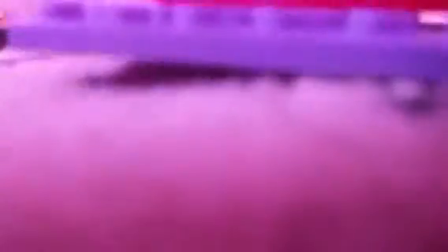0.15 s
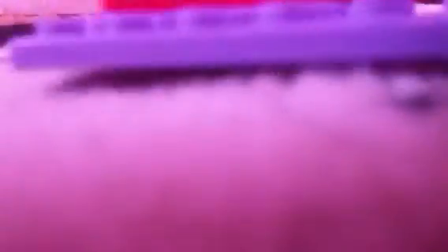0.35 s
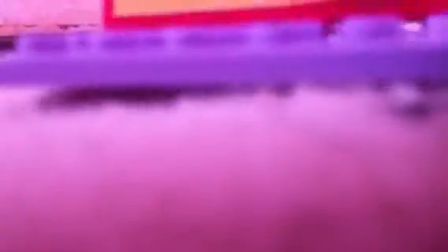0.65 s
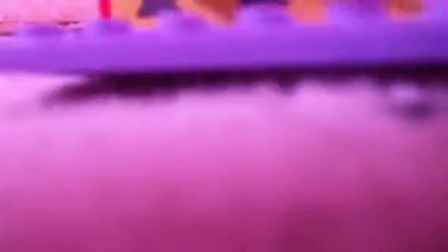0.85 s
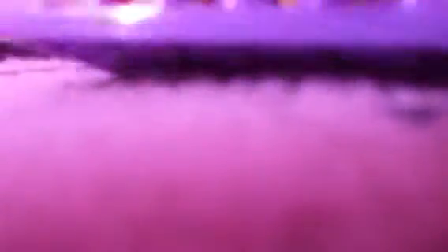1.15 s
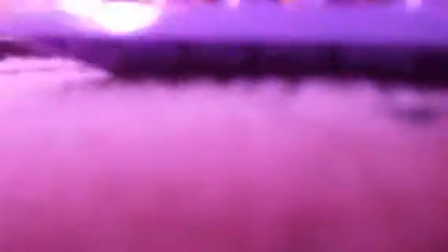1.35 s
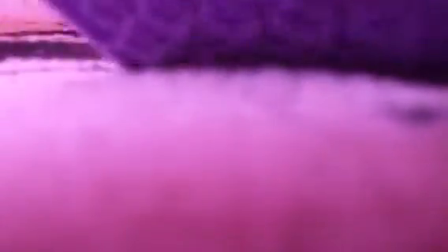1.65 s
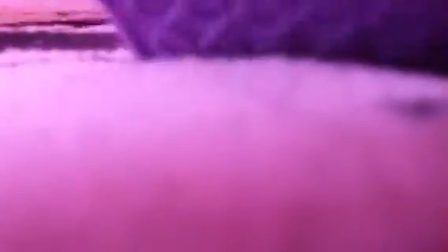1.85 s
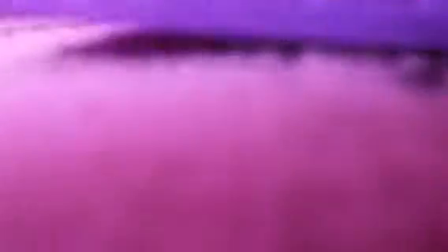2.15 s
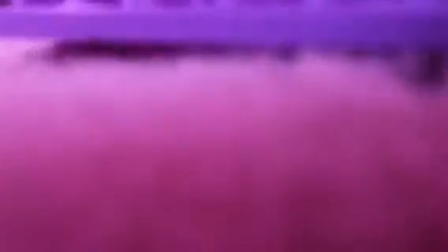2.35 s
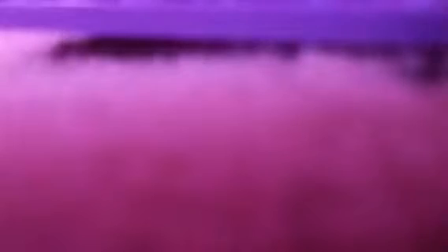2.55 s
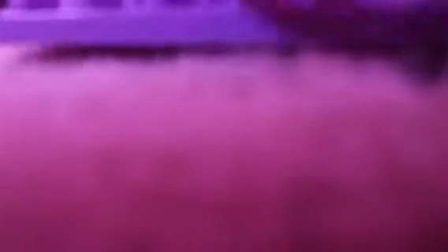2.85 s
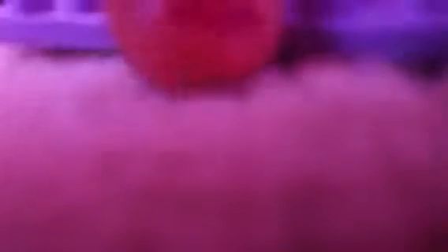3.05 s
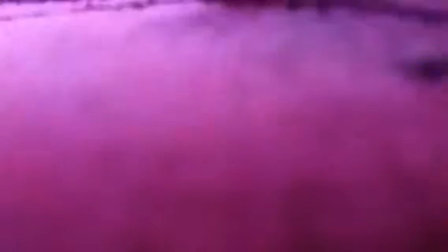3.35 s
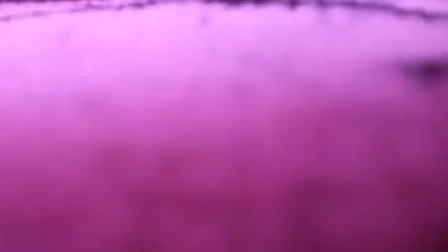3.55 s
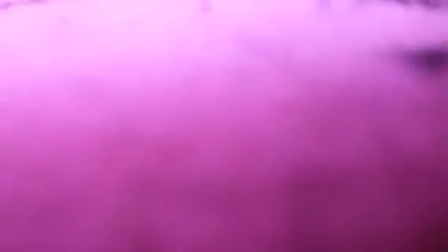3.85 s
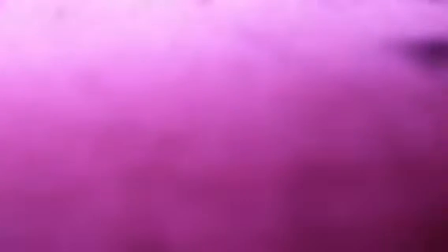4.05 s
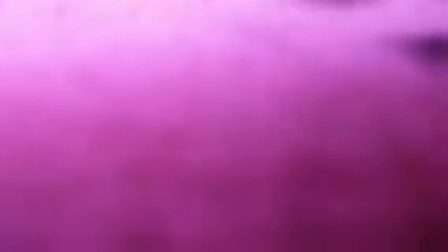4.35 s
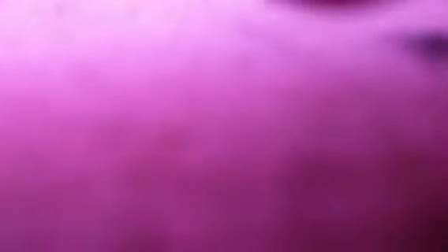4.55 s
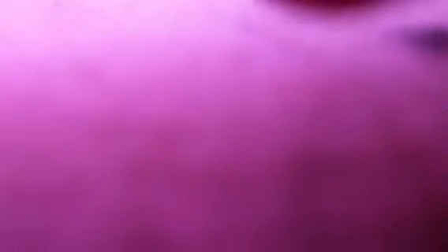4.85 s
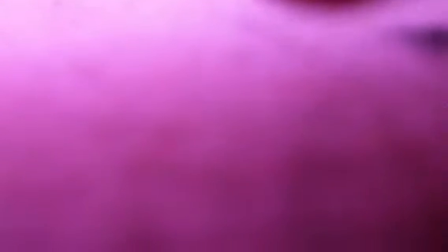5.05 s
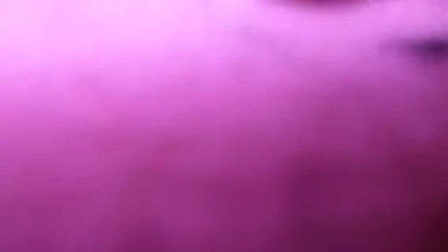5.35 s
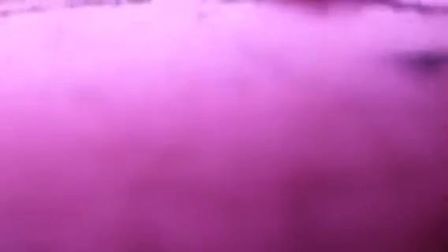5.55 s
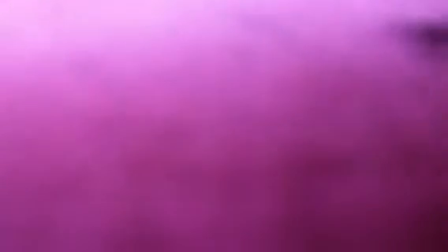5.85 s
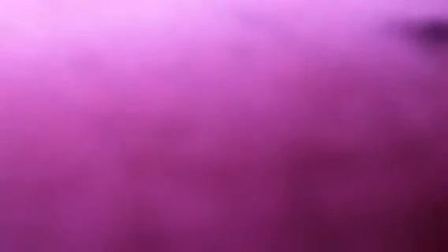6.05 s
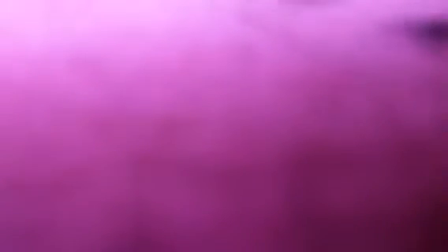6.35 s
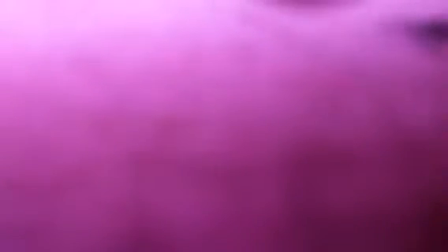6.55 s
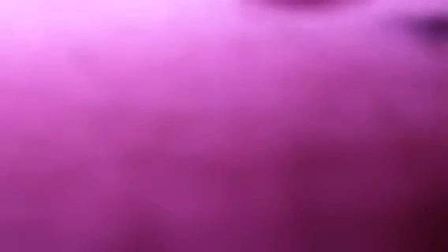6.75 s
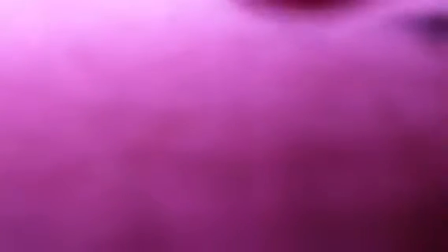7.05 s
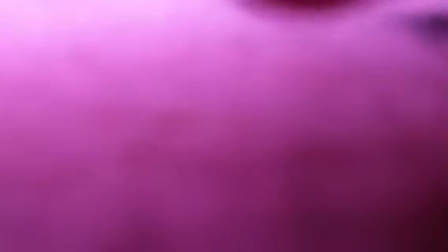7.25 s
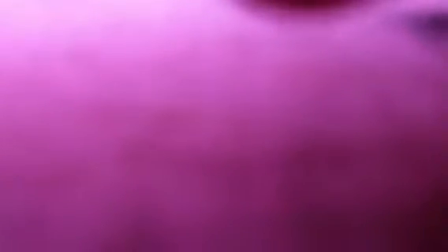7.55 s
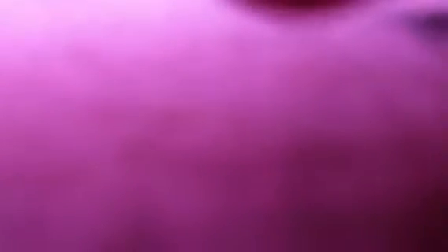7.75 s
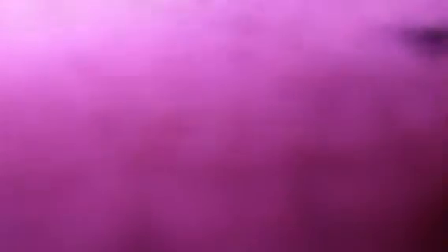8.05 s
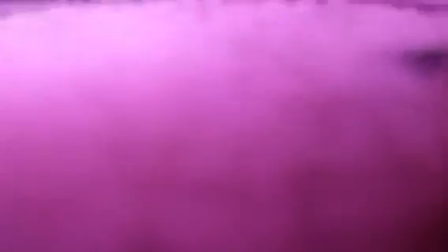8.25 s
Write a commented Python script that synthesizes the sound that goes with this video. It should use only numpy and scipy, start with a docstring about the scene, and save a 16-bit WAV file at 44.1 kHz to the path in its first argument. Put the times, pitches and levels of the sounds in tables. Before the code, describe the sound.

Plastic building bricks are handled on a soft cover, very near a small, thin-sounding microphone with a short indoor tail. First comes a loud rapid tumble, then quiet rubbing and a soft slide, scattered plate ticks, and a cluster of firm stud clicks with gritty slips. Long gaps hold only faint hiss and brushing until one hollow knock, light scrapes and a final double bump against the camera.

```python
"""Loose plastic toy bricks clatter, scrape and tap on a soft cover, beside a small camera in a quiet room.
A base plate is tapped and slid, a brick is worked onto its studs in small slips, and fingers rub the plastic.
A piece snaps home with a hollow knock, and soft bumps thud in the camera's case.
Knocks are sums of fading tones, most with bursts of noise; rubs and scrapes are trains of tiny random slips.
A faint room tail and a steady hush complete the scene."""
import sys
import numpy as np
from scipy import signal
from scipy.fft import rfft, irfft, next_fast_len
from scipy.io import wavfile

SR = 44100
rng = np.random.default_rng(int(sys.argv[2]) if len(sys.argv) > 2 else 0)


def to_wav(sig):
    """Store sig (one row per channel, or 1-D mono) as 16-bit WAV at the path in sys.argv[1].

    Samples outside -1..1 are clipped; the rate is SR.
    """
    pcm = np.clip(np.atleast_2d(sig), -1, 1) * 32767
    pcm = np.round(pcm).astype(np.int16)
    wavfile.write(sys.argv[1], SR, pcm.T)  # frames by channels


N = 370881  # length of the scene in samples

# tones of the loose bricks: (frequency [Hz], width [Hz], level [dB]); a wider tone fades faster
LOOSE_TONES = [(1250, 400, -6), (2690, 120, -1), (3570, 50, -7), (3980, 150, 1), (4450, 150, -2),
               (5080, 200, -7), (5990, 50, -9), (6220, 45, -9), (6430, 40, -9), (6960, 170, -4),
               (8030, 70, -15), (10400, 70, -19), (11600, 76, -21), (13150, 130, -12)]
# tones of the sockets that grip the studs: (frequency [Hz], width [Hz], level [dB])
SOCKET_TONES = [(1670, 180, 0), (2840, 230, -1), (3790, 310, -4), (5560, 110, -4), (6380, 94, -3),
                (7270, 73, -10), (7990, 200, -10), (8840, 120, -13), (9280, 140, -6), (9640, 100, -12),
                (10600, 200, -11)]
# colour of hard plastic on plastic: (frequency [Hz], level per Hz [dB])
PLASTIC_COLOUR = [(60, -28.5), (200, -6.5), (600, -7.5), (1400, 3), (4000, -1.5), (7000, -0.5),
                  (10000, -15), (13000, -14), (16000, -20)]
# colour of a soft rub on plastic: (frequency [Hz], level per Hz [dB])
RUB_COLOUR = [(530, -33.5), (900, -5.5), (1480, -6), (1630, -1), (2100, -2.5), (3800, 0.5), (7320, -2),
              (15500, -16.5)]
# colour of the soft cover: (frequency [Hz], level per Hz [dB])
COVER_COLOUR = [(60, -15), (160, -0.5), (250, -1), (500, -7), (1100, -17), (2200, -23), (6000, -37)]


def amp(db):
    """Turns decibels into a gain."""
    return 10 ** (np.asarray(db) / 20)


def unit(x):
    """Scales a sound to an rms of 1."""
    return x / np.sqrt(np.mean(x ** 2) + 1e-20)


def fade(t, t60):
    """A natural fade that drops 60 dB in t60 seconds."""
    return np.exp(-np.log(1000) * t / t60)


def read(points, hz):
    """Reads a table between its points, along a log-frequency axis."""
    f, value = np.transpose(points)
    return np.interp(np.log(hz + 1), np.log(f + 1), value)


def colour(x, points):
    """Filters a sound so that each frequency gets the gain in the table."""
    size = next_fast_len(len(x))
    hz = np.fft.rfftfreq(size, 1 / SR)
    return irfft(rfft(x, size) * amp(read(points, hz)), size)[:len(x)]


def add(mix, s, sound):
    """Mixes a sound in at a time in seconds."""
    part = mix[max(round(s * SR), 0):][:len(sound)]
    part += sound[:len(part)]


def ringing(modes, size=6000):
    """Fading tones that start together after one blow; neighbouring tones swing opposite ways."""
    hz, width, db = np.transpose(modes)[:, :, None]
    t = np.arange(size) / SR
    tones = amp(db) * np.exp(-np.pi * width * t) * np.sin(2 * np.pi * hz * t)
    return (-1.) ** np.arange(len(hz)) @ tones


def struck(modes, detune=0.0094, ring=1, spread_db=1.5):
    """Each place of contact weights the tones anew, and the grip detunes them a little."""
    hz, width, db = np.transpose(modes)
    weight, shift, side = rng.standard_normal((len(hz), 3)).T
    t = np.arange(2646) / SR
    # a wider tone fades sooner, so it starts higher
    height = np.sign(side) * width * amp(db + spread_db * weight)
    decay = np.exp(-np.pi * np.outer(width / ring, t))
    return height @ (decay * np.sin(2 * np.pi * np.outer(hz * (1 + detune * shift), t)))


def voiced(x, levels_db):
    """Sets a click's strength (over 10 ms) in bass, middle and treble: soft contacts are dull, hard ones bright."""
    edges_hz = [(150, 1400), (1400, 5000), (5000, 16000)]
    centres_hz = [900, 2600, 7000]
    z, hz = rfft(x), np.fft.rfftfreq(len(x), 1 / SR)
    for _ in range(3):  # the gains blend between bands, so approach the levels in steps
        energy = np.array([(abs(z[(hz >= a) & (hz < b)]) ** 2).sum() for a, b in edges_hz]) * 2 / len(x)
        gain_db = np.array(levels_db) - 10 * np.log10(energy / (SR / 100) + 1e-20)
        z = z * amp(read(list(zip(centres_hz, gain_db)), hz))
    return irfft(z, len(x))


def clicks(contacts, modes, detune, ring, crack_db, crack_t60, tick_db, scuff_db):
    """A contact is a brief scuff, a sharp tick, a crack of fast-dying noise from the walls, and the piece's ring.

    detune is a share of each pitch; ring stretches the fading times of the tones.
    """
    out = np.zeros(N)
    lead = 300  # samples of scuff ahead of the contact
    for s, db, bass_db, treble_db in contacts:
        body = unit(struck(modes, detune, ring))
        t = np.arange(len(body)) / SR
        walls = unit(rng.standard_normal(len(t)) * fade(t, crack_t60))
        tick = unit(1. * (t == 0))
        contact = np.pad(walls + amp(tick_db) * tick, (lead, 0))
        sound = np.pad(body, (lead, 0)) + amp(crack_db) * unit(colour(contact, PLASTIC_COLOUR))
        # the edges graze each other harder and harder just before they catch
        graze = unit(rng.standard_normal(lead) * np.linspace(0, 1, lead)) / np.sqrt(lead)
        scuff = np.pad(signal.fftconvolve(graze, sound[lead:]), (0, 1))
        sound = sound + amp(scuff_db) * scuff
        add(out, s - lead / SR, voiced(sound, [db + bass_db, db, db + treble_db]))
    return out


def collision(s, db, treble_db, chatter_s, gap_s, bass_db, count):
    """One collision as contacts (s, level dB, bass dB, treble dB): rebounds come ever sooner, weaker and duller."""
    gap_share = .92  # each gap against the one before; the first gap is this share of gap_s
    dulling_db = 2  # treble lost at each rebound
    chatter_fall_db, chatter_hold = 18.5, 2  # fall after chatter_s; a higher hold keeps the start level longer
    # soft, dull contacts are mostly thud: dB of bass gained per dB under a firm contact, and per dB of treble lost
    firm_db, thud_per_softness, thud_per_dullness = -44, 0.27, .2
    k = np.arange(count)
    # the first contact falls at the collision's own time
    delay = np.cumsum(gap_s * gap_share ** k) - gap_s
    fall_db = np.minimum(chatter_fall_db * (delay / chatter_s) ** chatter_hold, 60)
    thud_db = bass_db - thud_per_softness * (db - firm_db) - thud_per_dullness * treble_db
    return zip(s + delay, db - fall_db, np.full(count, thud_db), treble_db - dulling_db * k)


def collisions(table, **piece):
    """All the contacts that one kind of piece makes."""
    return [contact for event in table for contact in collision(*event, **piece)]


def sliding(table, hiss, per_s, spread_db, modes=None, ring_db=0):
    """Each stroke is a train of tiny slips, a few of them larger, that hiss and may ring the piece under them."""
    out = np.zeros(N)
    for s, length, db, tilt in table:
        force, chance, push = rng.exponential(1, SR), rng.random(SR), rng.standard_normal(SR)
        strength = amp(spread_db * np.minimum(force, 4)) * push
        slips = (strength * (chance < per_s / SR))[:max(int(length * SR), 200)]
        sound = unit(colour(slips, hiss))
        if modes is not None:
            ring = signal.fftconvolve(slips, struck(modes))[:len(slips)]
            sound = sound + amp(ring_db) * unit(ring)
        # tilt the spectrum, in dB per octave
        sound = unit(colour(sound, [(125, -4 * tilt), (16000, 3 * tilt)]))
        add(out, s, amp(db) * sound * signal.windows.tukey(len(sound), .7))
    return out


def strokes(table, brightness_db):
    """A firmer hand sounds duller: each stroke gets its brightness (dB per octave) from its level."""
    light_touch_db, duller_per_db = -66, 0.72
    return [(s, length, db, brightness_db - duller_per_db * (db - light_touch_db)) for s, length, db in table]


def hush():
    """The room's steady hush is noise with a fixed colour."""
    # the hush: (frequency [Hz], level per Hz [dB])
    air_colour = [(25, 0), (60, -16), (110, -7), (170, -4), (300, -3.5), (420, -6), (600, -9), (1000, -13),
                  (2000, -17), (5000, -17.5), (10000, -19.5), (16000, -22)]
    return amp(-66.5) * unit(colour(rng.standard_normal(N), air_colour))


def loose_clatter():
    """Loose bricks tumble together, each collision rebounding in a quick chatter."""
    # (time [s], level at 1.4-5 kHz [dB], treble against that level [dB], chatter length [s])
    tumbles = [(.1223, -27, 0.5, 0.018), (.1608, -23.5, -2, 0.0096), (.1831, -42.5, -15, .005),
               (.1888, -44, -6, .004), (.1963, -49, -5, 0.017), (.282, -41.5, -4, 0.014),
               (.2876, -37, -2.5, 0.0052), (.3155, -46, -3.5, 0.0045), (.3673, -40.5, -11.5, 0.019),
               (.3868, -51, -23, 0.0097), (.4294, -49.5, -25, 0.0057)]
    return clicks(collisions(tumbles, gap_s=.0045, bass_db=-10.5, count=5), LOOSE_TONES,
                  detune=.009, ring=.83, crack_db=-6, crack_t60=.022, tick_db=-7.5, scuff_db=-42.5)


def edge_scrapes():
    """Brick edges scrape along each other, and the slips ring the bricks."""
    # (time [s], length [s], level [dB], brightness [dB per octave])
    scrapes = [(.1505, 0.018, -31.5, -1.5), (.292, 0.13, -54.5, 0), (2.015, .12, -56, 2),
               (2.18, 0.041, -57, -2), (2.8, 0.11, -64.5, -3), (4.128, 0.045, -54.5, -5),
               (4.34, .11, -59, -7), (4.783, 0.036, -57, -2), (8.343, 0.023, -53, 5)]
    return sliding(scrapes, PLASTIC_COLOUR, per_s=2000, spread_db=2.0, modes=LOOSE_TONES, ring_db=-0.5)


def small_brick_taps():
    """One small brick, free to ring; how it is held sets its lowest tone."""
    # (time [s], level at 1.4-5 kHz [dB], treble against that level [dB], lowest tone [Hz])
    taps = [(0.4123, -49, -5, 1800), (0.5919, -39.5, -3, 1670), (2.2289, -41, 2.5, 2110)]
    # the brick's higher tones: (frequency [Hz], width [Hz], level [dB])
    higher_tones = [(3970, 430, -11.5), (6460, 77, 1), (7660, 150, -12), (8960, 170, -13),
                    (12000, 280, -33), (13200, 210, -19)]
    out = np.zeros(N)
    for s, db, treble_db, low_hz in taps:
        contacts = collision(s, db, treble_db, chatter_s=0.0041, gap_s=0.0033, bass_db=-14.5, count=2)
        tones = [(low_hz, 75, 0)] + higher_tones  # lowest tone: 75 Hz wide, at 0 dB
        out += clicks(contacts, tones, detune=0.0054, ring=0.59,
                      crack_db=-12.0, crack_t60=0.025, tick_db=-0.5, scuff_db=-8)
    return out


def cover_brushes():
    """A hand brushes the soft cover: a dense, dull train of slips."""
    # (time [s], length [s], level [dB])
    brushes = [(.5, 0.15, -63), (1.49, 0.083, -65), (2.02, 0.34, -65), (3.22, 0.43, -64),
               (4.3, 0.37, -69.5), (6.05, 0.39, -66), (7.85, 0.42, -68)]
    return sliding(strokes(brushes, brightness_db=2.0), COVER_COLOUR, per_s=2300, spread_db=2)


def brick_drags():
    """A brick drags on the build, and its slips ring the build."""
    # (time [s], length [s], level [dB], brightness [dB per octave])
    drags = [(.505, 0.051, -69, -4), (6.321, 0.046, -59, 0.5), (6.365, 0.056, -58.5, 1.5),
             (6.73, 0.098, -63, -2.5), (6.93, 0.068, -64.5, 7), (7.075, 0.054, -59.5, 10),
             (8.19, 0.054, -62.5, 3.5)]
    # tones of the build: (frequency [Hz], width [Hz], level [dB])
    build_tones = [(1850, 130, 8), (3250, 120, 2.5), (3700, 82, 8), (7360, 110, -1.5), (9780, 67, 3.5)]
    return sliding(drags, RUB_COLOUR, per_s=1200, spread_db=2.5, modes=build_tones, ring_db=1.0)


def finger_rubs():
    """Fingers rub over plastic: the skin slips many times a second, with no ring."""
    # (time [s], length [s], level [dB])
    rubs = [(.62, .17, -69), (1.05, .23, -70), (2.235, 0.084, -65), (2.72, 0.24, -66), (3.22, .17, -61),
            (3.38, .15, -66), (5.2, .12, -70.5), (6.02, 0.23, -66), (6.15, .1, -61.5), (7.84, 0.16, -64)]
    return sliding(strokes(rubs, brightness_db=.5), RUB_COLOUR, per_s=2700, spread_db=3.0)


def camera_bumps():
    """Soft bumps reach the camera as dull thuds carried through its case."""
    # (time [s], level [dB])
    thuds = [(0.64, -48), (2.104, -51.5), (2.553, -51.5), (2.603, -56.5), (2.834, -49), (4.402, -59.5),
             (5.671, -60.5), (6.476, -38.5), (8.349, -39.5), (8.37, -44.5), (8.386, -39)]
    # tones of the case: (frequency [Hz], width [Hz], starting amplitude against the bump's level [dB])
    case_tones = [(150, 45, -36), (199, 59, 6.5), (330, 94, 6.5), (422, 160, 4.5), (600, 240, -39)]
    out = np.zeros(N)
    for s, db in thuds:
        add(out, s, amp(db) * ringing(case_tones))
    return out


def plate_taps():
    """Bricks and nails tap the base plate, each with one rebound."""
    # (time [s], level at 1.4-5 kHz [dB], treble against that level [dB])
    taps = [(.6410, -50, -35), (2.0615, -50.5, -17), (2.0941, -52, -29), (2.1014, -53.5, 4.5),
            (2.1737, -54, -12), (2.3853, -59.5, -31), (2.4407, -58.5, -11.5), (2.475, -33.5, -4),
            (2.4917, -49, -25), (2.5013, -46, -13), (2.549, -48, -7), (2.5678, -59.5, -10),
            (2.7328, -62, 0), (2.8335, -45.5, -6), (2.95, -60.5, -11.5), (3.537, -36.5, 0.5)]
    # tones of the plate: (frequency [Hz], width [Hz], level [dB])
    plate_tones = [(727, 160, 3), (1040, 77, -22), (2620, 72, -7), (3960, 280, 4), (4560, 86, 3),
                   (4840, 87, -29), (7100, 2500, -7), (8420, 220, -2), (9800, 230, -3), (12900, 260, -13)]
    return clicks(collisions(taps, chatter_s=0.0038, gap_s=.0037, bass_db=-11.0, count=2), plate_tones,
                  detune=0.014, ring=0.58, crack_db=-2.5, crack_t60=0.017, tick_db=-12, scuff_db=-30)


def plate_slides():
    """The tilted plate slides on the cover, and the slips ring its hollow underside."""
    # (time [s], length [s], level [dB], brightness [dB per octave])
    slides = [(1.61, .15, -61, 2.5)]
    # tones of the underside: (frequency [Hz], width [Hz], level [dB])
    underside_tones = [(910, 390, 0.5), (1140, 210, 7.5), (1913, 330, -18)]
    return sliding(slides, COVER_COLOUR, per_s=5000, spread_db=1.5, modes=underside_tones, ring_db=-4)


def press_clicks():
    """A held brick hits the studs, each time with one rebound."""
    # (time [s], level at 1.4-5 kHz [dB], treble against that level [dB])
    presses = [(4.1246, -30.5, -7.5), (4.1675, -36, -6.5), (4.1829, -44, -12), (4.1972, -33.5, -7.5),
               (4.262, -62, -4), (4.3083, -47, -16.5), (4.3275, -53.5, -18), (4.3563, -63, -8),
               (4.365, -51.5, -24), (4.4079, -53.5, -41), (4.7552, -43.5, -10), (4.7744, -38.5, -10),
               (4.7856, -48, -10), (7.3737, -62, -5.5), (8.064, -66, -10)]
    # tones of the held brick: (frequency [Hz], width [Hz], level [dB])
    held_tones = [(1990, 170, -2), (2890, 170, -6), (3260, 270, -4), (3726, 200, 2), (4760, 58, -28),
                  (5650, 82, -34), (6200, 450, -6.5), (7540, 280, -19.5), (9500, 590, -2)]
    return clicks(collisions(presses, chatter_s=0.0031, gap_s=.0032, bass_db=-13.0, count=2), held_tones,
                  detune=0.02, ring=1.45, crack_db=-3, crack_t60=0.027, tick_db=-23.0, scuff_db=-20.0)


def socket_creep():
    """Studs creep in their sockets between the larger slips."""
    # (time [s], length [s], level [dB], brightness [dB per octave])
    creeps = [(4.438, .03, -57, -3), (4.484, .04, -54, -1), (4.54, .04, -60, -3), (4.595, .16, -62, -1)]
    return sliding(creeps, PLASTIC_COLOUR, per_s=1400, spread_db=0.5, modes=SOCKET_TONES, ring_db=4)


def stud_slips():
    """Studs stick in their sockets, then slip with a click."""
    # (time [s], level at 1.4-5 kHz [dB], treble against that level [dB])
    slips = [(4.4485, -46, -11.5), (4.5005, -44, -1.5), (4.5443, -53, -7), (4.612, -48, -3),
             (4.6546, -42, 1), (4.685, -48.5, 0), (4.7083, -45.5, -7), (4.7213, -56, -11)]
    return clicks(collisions(slips, chatter_s=0.0075, gap_s=0.0037, bass_db=-15.5, count=2), SOCKET_TONES,
                  detune=.03, ring=2, crack_db=-10, crack_t60=.018, tick_db=-12, scuff_db=-6)


def hollow_knock(snap_db=-24, snap_t60=0.005):
    """A piece snaps home in a burst of noise, and the hollow build resounds."""
    # tones of the whole build: (frequency [Hz], width [Hz], starting amplitude [dB])
    knock_tones = [(190, 790, -38.5), (315, 360, -25.5), (566, 17, -38.5), (620, 180, -35), (1120, 470, -4),
                   (1830, 49, -25), (2690, 400, -17), (3130, 170, -19), (3830, 140, -23), (5240, 150, -49),
                   (6660, 160, -37)]
    knock_s = 6.4733
    out, t = np.zeros(N), np.arange(2000) / SR
    snap = colour(rng.standard_normal(len(t)), PLASTIC_COLOUR) * fade(t, snap_t60)
    add(out, knock_s, ringing(knock_tones))
    add(out, knock_s, amp(snap_db) * snap)
    return out


def room(x, onset_s=0.0063):
    """A short tail from a furnished room: sparse random echoes that fade at a rate set by pitch."""
    # (frequency [Hz], time to fade by 60 dB [s])
    fade_times = [(200, 0.15), (4000, 0.22), (14000, 0.079)]
    t = np.arange(SR // 2) / SR
    echoes = rng.standard_normal(len(t)) * (rng.random(len(t)) < .1) * (t > onset_s)
    hz, when, z = signal.stft(echoes, SR, nperseg=256)
    faded = z * fade(when, read(fade_times, hz)[:, None])
    tail = signal.istft(faded, SR, nperseg=256)[1]
    return signal.oaconvolve(x, tail / np.linalg.norm(tail))[:N]


def scene():
    """All the plastic sounds in their room, over a steady hush."""
    bricks = loose_clatter() + edge_scrapes() + small_brick_taps() + brick_drags()
    bricks += plate_taps() + press_clicks() + socket_creep() + stud_slips()
    hands = cover_brushes() + finger_rubs() + plate_slides()
    hollow = hollow_knock()
    tail = amp(-26.5) * room(bricks + amp(-3.5) * hollow)
    return (hush() + bricks + hands + camera_bumps() + hollow + tail)[None]


def record(dry):
    """The small microphone loses the deep bass; then the camera cuts off the highest treble."""
    mic_low_hz, edge_hz = 105, 15950
    thin = signal.sosfilt(signal.butter(3, mic_low_hz, "highpass", fs=SR, output="sos"), dry)
    band_limit = signal.firwin(401, edge_hz, window=("kaiser", 8), fs=SR)
    return signal.oaconvolve(thin, band_limit[None], "same")


dry = scene()
out = record(dry)
to_wav(out)
```